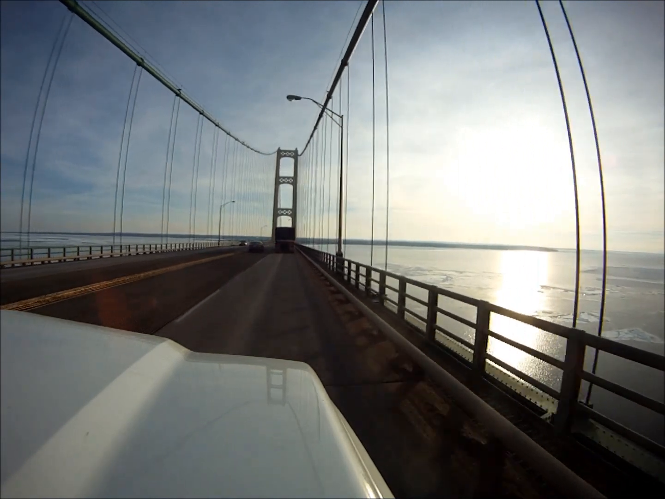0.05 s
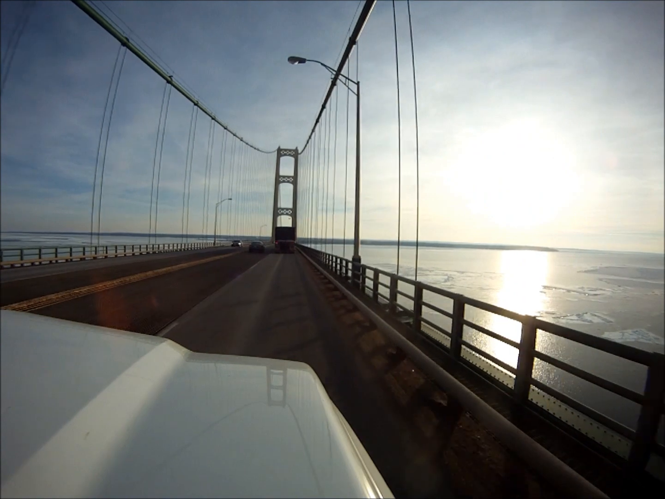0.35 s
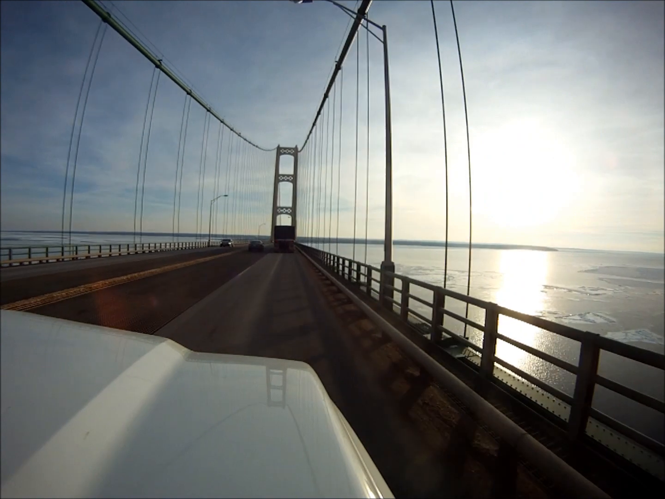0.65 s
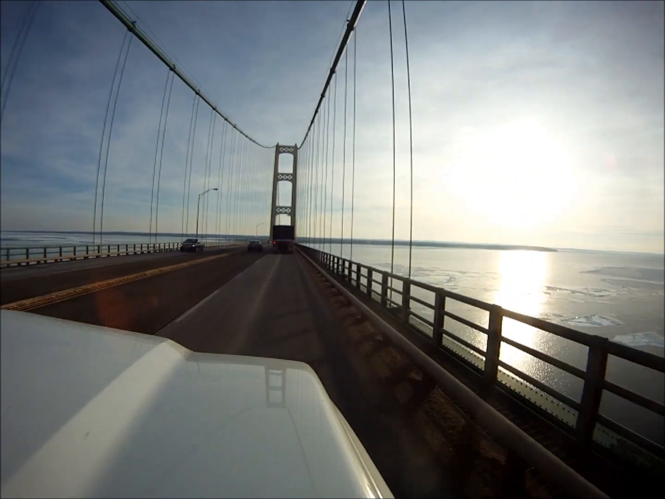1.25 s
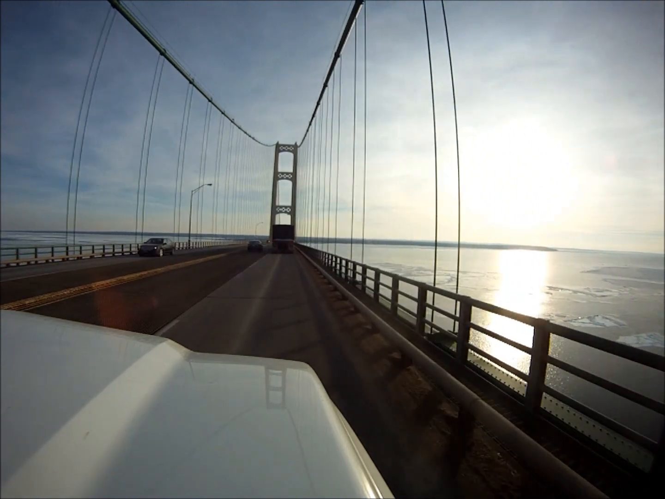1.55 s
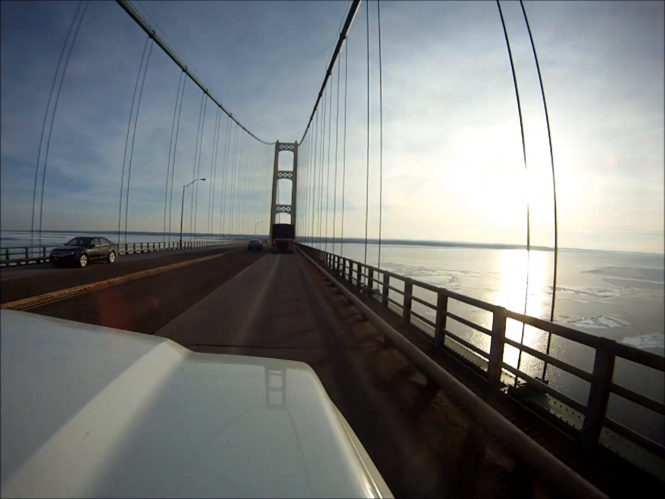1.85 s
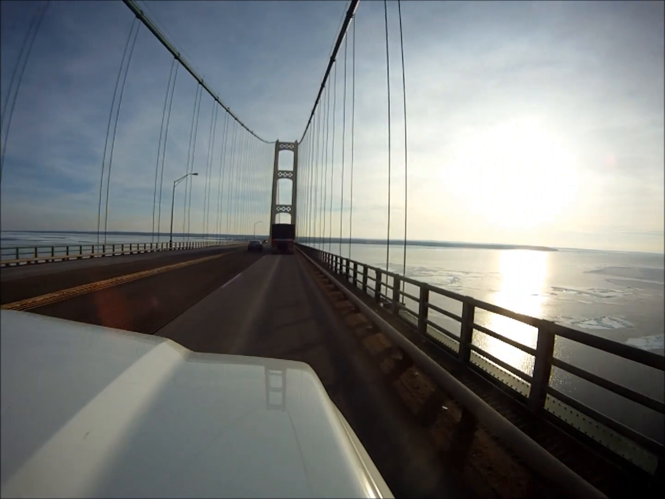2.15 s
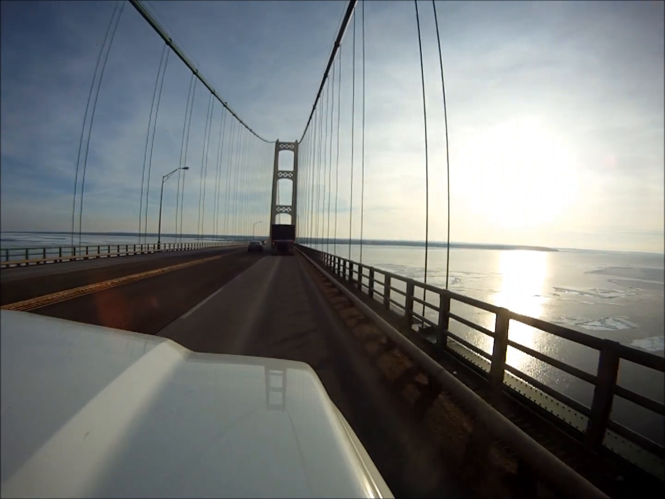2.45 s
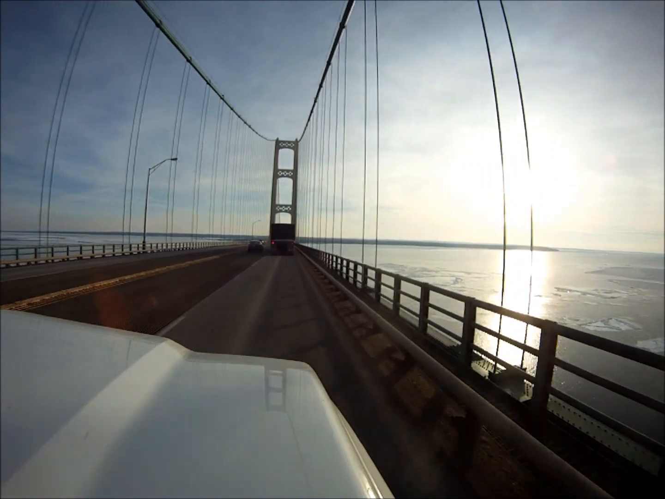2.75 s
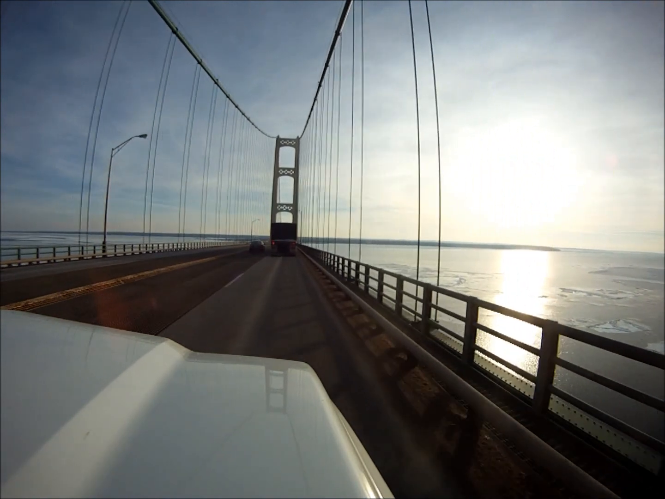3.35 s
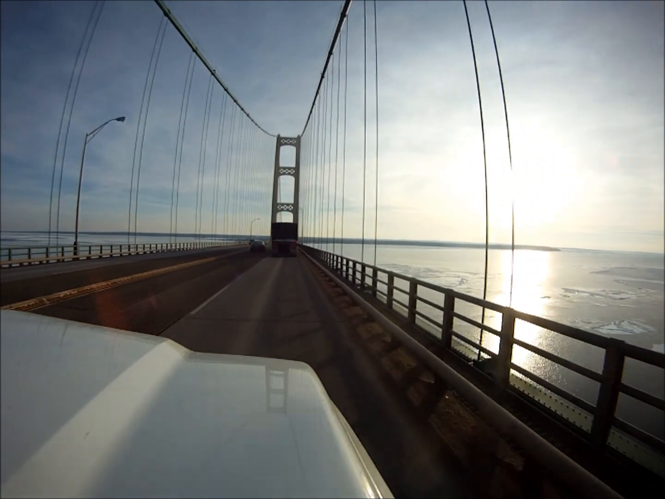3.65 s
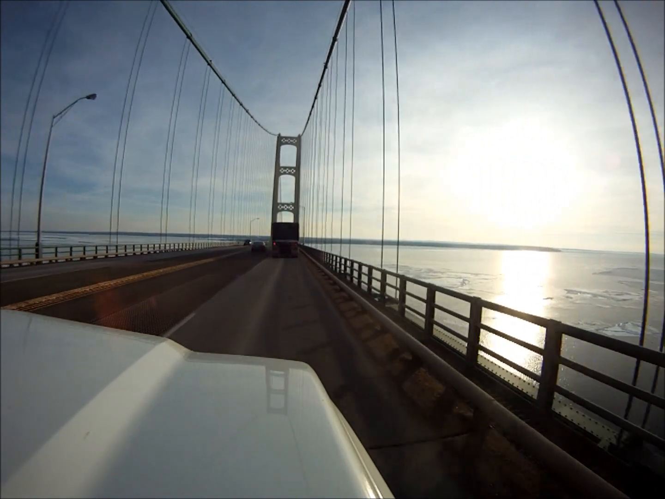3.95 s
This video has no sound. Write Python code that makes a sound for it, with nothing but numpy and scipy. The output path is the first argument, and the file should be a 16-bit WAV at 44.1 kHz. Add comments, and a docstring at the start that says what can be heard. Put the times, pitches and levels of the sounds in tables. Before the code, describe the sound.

Gusty wind with a thin fizz blows across a microphone on the outside of a moving truck. The bridge deck rumbles steadily below, with a deep double thud and a tick early on, then another double thud later.

```python
"""Wind rushes and flutters through the housing resonances of a camera mounted outside a truck.
The truck crosses a suspension bridge: the deck rumbles, the tyres knock, the body trembles.
Both axles cross two deck joints and set the body shuddering; the mount ticks once.
A low hum wavers throughout. A sample-and-hold stage mirrors the wind into a thin fizz."""
import sys
import numpy as np
from scipy.fft import rfft, irfft, next_fast_len
from scipy.io import wavfile
from scipy.ndimage import map_coordinates

SR = 44100
rng = np.random.default_rng(int(sys.argv[2]) if len(sys.argv) > 2 else 0)


def generate_wav(sig):
    """Save sig (samples, or channels by samples) to the path in sys.argv[1] as 16-bit PCM at SR."""
    pcm = np.round(np.clip(np.atleast_2d(sig).T, -1, 1) * 32767).astype(np.int16)
    wavfile.write(sys.argv[1], SR, pcm)


N = 176400

# Wind loudness: gusts, with a brief duck at the tick. Each row: time in seconds, relative level in dB.
WIND_LEVELS = [(0.0, -26.5), (0.04, -22.5), (0.08, -31.5), (0.11, -30), (0.12, -36), (0.18, -27),
               (0.22, -30), (0.23, -26.5), (0.27, -27), (0.47, -24), (0.5, -28.5), (0.53, -29.5),
               (0.54, -33), (0.56, -28.5), (0.59, -23.5), (0.62, -28.5), (0.71, -24.5), (0.9, -30.5),
               (0.93, -26.5), (1.12, -28), (1.15, -31), (1.31, -26.5), (1.66, -24.5), (1.67, -27.5),
               (1.77, -27.5), (1.78, -25), (2.06, -27), (2.17, -23.5), (2.31, -30.5), (2.44, -26),
               (2.77, -24), (2.83, -29), (2.9, -26), (2.93, -29), (3.03, -29.5), (3.04, -25.5), (3.11, -32),
               (3.33, -26), (3.35, -28), (3.44, -25), (3.51, -30), (3.58, -27.5), (3.62, -22.5),
               (3.64, -27), (3.91, -32), (3.95, -27.5), (3.97, -31.5), (3.99, -25), (4.0, -30)]
# Housing resonances. Each row: centre in Hz, half width in Hz, relative level in dB.
HOUSING_MODES = [(1111.5, 69.3, 0.0), (1329, 120, -2.5), (1723, 154, -8.2), (2055, 121, -3),
                 (2330, 228, -6), (2925, 143, -13.5), (3213, 180, -12.6), (3622, 266, -12.5),
                 (4078, 258, -23), (4670, 111, -27.5), (5167, 322, -18.5)]
# Broad rush of air. Each row: frequency in Hz, relative density in dB.
RUSH_SPECTRUM = [(100, -6), (300, 3), (430, -1.5), (570, 2.5), (640, 1), (850, 1.5), (1200, -4.5),
                 (2500, -17), (6000, -48)]
# Axles on joints. Each row: start in seconds, gain in dB, rise in seconds, pitch in Hz, T60 in seconds.
JOINT_CROSSINGS = [(0.493, -12, 0.012, 33, 0.69), (.778, -4, 0.057, 31.4, 0.41),
                   (2.391, -13.5, 0.0063, 33.06, 1.0), (2.68, -7.5, .06, 30.9, 0.6)]
# Modes of the truck body. Each row: multiple of the pitch, gain in dB.
BODY_MODES = [(1, 2), (1.45, -16), (2.3, -16)]
# Tyre blows on the deck. Each row: start in seconds, gain in dB, pitch in Hz, T60 in seconds.
TYRE_KNOCKS = [(.472, -31, 570, .12), (2.37, -35, 590, 0.11), (2.672, -21, 85, .1), (3.235, -23, 165, .16)]
# Uneven level of a low hum near 227 Hz. Each row: time in seconds, relative level in dB.
HUM_LEVELS = [(0.0, -43), (0.04, -40.5), (0.32, -41), (0.36, -27), (0.46, -55), (0.52, -35.5),
              (0.62, -33.5), (0.71, -47), (0.76, -35.5), (0.89, -45), (0.95, -34), (1.34, -41.5),
              (1.37, -33.5), (1.86, -41), (1.89, -25), (1.98, -49), (2.12, -35.5), (2.19, -46),
              (2.46, -32.5), (2.57, -48), (2.63, -32), (2.67, -39), (2.78, -34), (2.94, -39.5), (3.73, -37),
              (3.75, -29), (3.87, -43), (4.0, -35.5)]
# Body tremble. Each row: time in seconds, level in dB.
TREMBLE_LEVELS = [(0, -32), (.4, -30), (.55, -37), (1.15, -46), (1.35, -33), (1.9, -32), (2.3, -37.5),
                  (3.1, -45), (3.33, -28), (3.48, -43), (3.62, -30), (3.78, -39), (4, -33)]
# Deck rumble. Each row: frequency in Hz, relative density in dB.
RUMBLE_SPECTRUM = [(8, -26), (22, -9), (33, 3.5), (48, -0.5), (65, 0.5), (90, -2), (110, -7), (200, -12.5),
                   (280, -11.5), (340, -19.5), (500, -33.5), (1500, -70)]
# Body and tyre resonances. Each row: centre in Hz, half width in Hz, level in dB.
RUMBLE_MODES = [(120.3, 7, -48.5), (167.2, 8.6, -42), (228.7, 19.7, -43)]


def wind(gain_db=0.5, bright_hz=2700, bright_db_per_db=0.31, rush_db=-43.5, rush_db_per_db=0.53):
    """Turbulent air rings the housing over a broad rush; the louder the wind, the brighter."""
    level_db = curve(WIND_LEVELS)
    flutter_db = 0.42 * wobble(knots_per_s=35) + 0.53 * wobble(knots_per_s=400)
    swing_db = level_db - level_db.mean() + flutter_db
    air = resonant_noise(HOUSING_MODES)
    low = filtered(air, lambda hz: 1 / (1 + (hz / bright_hz) ** 8))
    high = (air - low) * amp(bright_db_per_db * swing_db)
    ringing = amp(level_db + flutter_db + gain_db) * (low + high)
    rush = amp(rush_db + rush_db_per_db * swing_db) * shaped_noise(RUSH_SPECTRUM)
    return ringing + rush


def joint_shudders():
    """Each axle crossing a deck joint rings the low modes of the body."""
    out = np.zeros(N)
    for start_s, gain_db, rise_s, pitch_hz, t60_s in JOINT_CROSSINGS:
        age_s = np.maximum(clock() - start_s, 0)
        ring = sum(amp(db) * np.sin(2 * np.pi * pitch_hz * ratio * age_s) for ratio, db in BODY_MODES)
        out += amp(gain_db) * ring * rise_and_decay(age_s, rise_s, t60_s)
    return out


def tyre_knocks(rise_s=0.004):
    """The tyres strike the deck: dull blows that ring briefly."""
    out = np.zeros(N)
    for start_s, gain_db, pitch_hz, t60_s in TYRE_KNOCKS:
        age_s = np.maximum(clock() - start_s, 0)
        ring = tone(pitch_hz, wander_hz=15, knots_per_s=150) / np.sqrt(2)
        out += amp(gain_db) * ring * rise_and_decay(age_s, rise_s, t60_s)
    return out


def mount_tick(centre_s=0.531, peak_db=-13, pitch_hz=1850, width_s=0.0013):
    """The mount ticks once under the first jolt."""
    offset_s = clock() - centre_s
    return amp(peak_db) * np.exp(-(offset_s / width_s) ** 2) * np.cos(2 * np.pi * pitch_hz * offset_s)


def low_hum(gain_db=-2):
    """A low hum near 227 Hz, uneven in level, with irregular peaks and dips."""
    return amp(curve(HUM_LEVELS) + gain_db) * tone(pitch_hz=227.1, wander_hz=8.06, knots_per_s=45)


def body_tremble():
    """The body shakes throughout: a deep, wavering tone."""
    return amp(curve(TREMBLE_LEVELS)) * tone(pitch_hz=30.7, wander_hz=2.52, knots_per_s=15)


def road_rumble(deck_db=-34.5):
    """Steady deck noise plus narrow resonances of the body and tyres."""
    deck = amp(deck_db) * shaped_noise(RUMBLE_SPECTRUM)
    return deck + sum(amp(db) * resonant_noise([(hz, width_hz, 0)]) for hz, width_hz, db in RUMBLE_MODES)


def amp(db):
    """Decibels to gain."""
    return 10 ** (np.asarray(db) / 20)


def unit_rms(x):
    """x scaled to rms 1."""
    return x / np.sqrt(np.mean(x ** 2) + 1e-20)


def clock():
    """Sample times in seconds."""
    return np.arange(N) / SR


def curve(rows):
    """One value per sample from (seconds, value) rows."""
    return np.interp(clock(), *np.transpose(rows))


def rise_and_decay(age_s, rise_s, t60_s):
    """Exponential rise times a decay of 60 dB per t60_s."""
    return (1 - np.exp(-age_s / rise_s)) * np.exp(-np.log(1000) * age_s / t60_s)


def wobble(knots_per_s):
    """Smooth random curve."""
    return map_coordinates(rng.standard_normal(N // 8), [clock() * knots_per_s + 3], mode="wrap")


def tone(pitch_hz, wander_hz, knots_per_s):
    """Sine of rms 1 with wandering pitch."""
    hz = pitch_hz + wander_hz * wobble(knots_per_s)
    return unit_rms(np.sin(2 * np.pi * np.cumsum(hz) / SR))


def filtered(x, response):
    """x filtered by the gain response(hz)."""
    size = next_fast_len(N + 8192)
    return irfft(rfft(x, size) * response(np.fft.rfftfreq(size, 1 / SR)), size)[:N]


def shaped_noise(spectrum):
    """Noise of rms 1 from (Hz, dB) rows."""
    knots_hz, db = np.transpose(spectrum)
    gain = lambda hz: amp(np.interp(np.log(hz + 1), np.log(knots_hz), db))
    return unit_rms(filtered(rng.standard_normal(N), gain))


def resonant_noise(modes):
    """Noise of rms 1 in steep resonances, from (Hz, half width in Hz, dB) rows."""
    def gain(hz):
        peaks = (amp(db) / (1 + ((hz - centre_hz) / width_hz) ** 2) for centre_hz, width_hz, db in modes)
        return np.sqrt(sum(peak ** 2 for peak in peaks))
    return unit_rms(filtered(rng.standard_normal(N), gain))


def scene():
    """All sources at one microphone."""
    continuous = wind() + road_rumble() + low_hum() + body_tremble()
    return (continuous + joint_shudders() + tyre_knocks() + mount_tick())[None]


def record(dry, hold_hz=12000, cutoff_hz=15330):
    """Sample-and-hold: the band is mirrored around the hold rate, then rolled off and cut."""
    band = filtered(dry[0], lambda hz: hz < hold_hz / 2)
    mirrored = band * (1 + 2 * np.cos(2 * np.pi * hold_hz * clock()))
    return filtered(mirrored, lambda hz: np.sinc(hz / hold_hz) * (hz < cutoff_hz))[None]


dry = scene()
out = record(dry)
generate_wav(out)
```